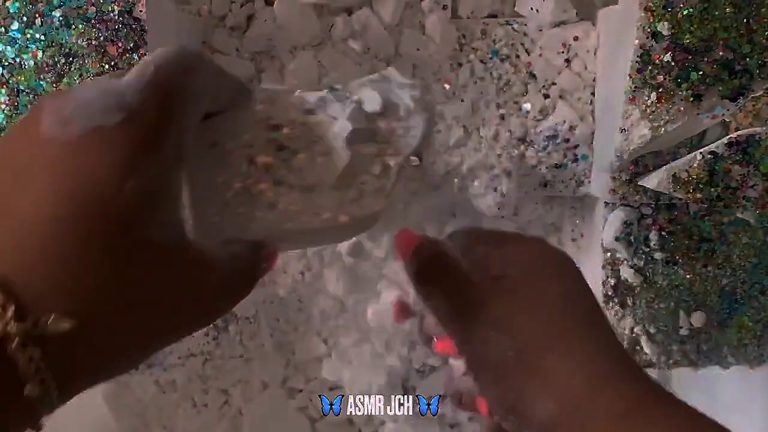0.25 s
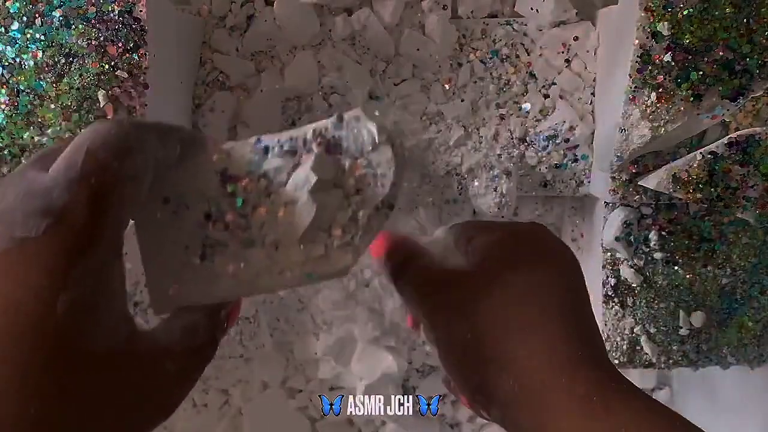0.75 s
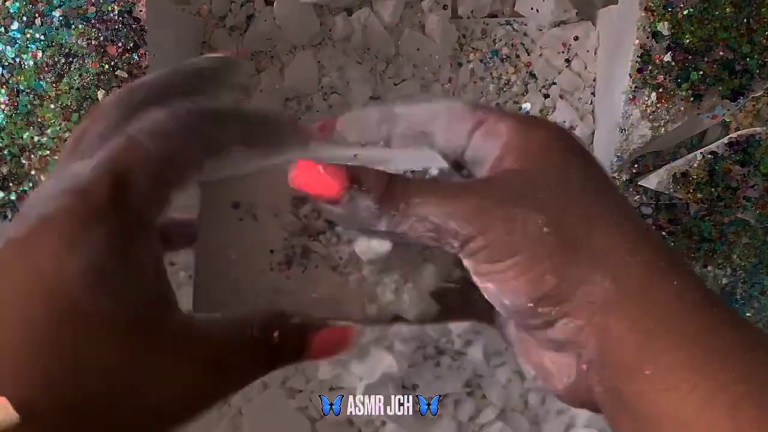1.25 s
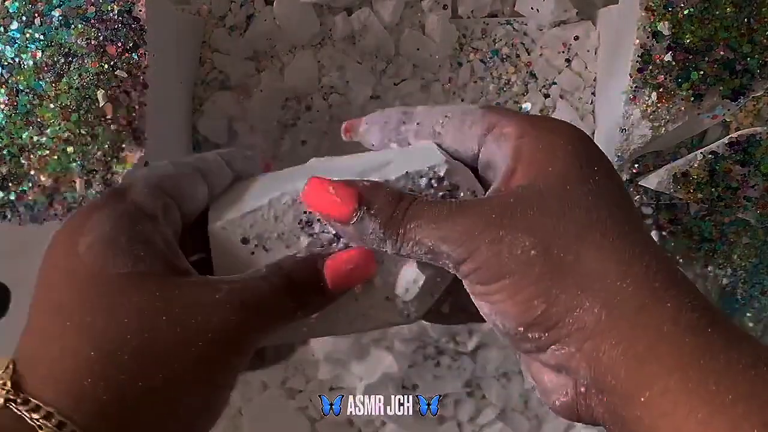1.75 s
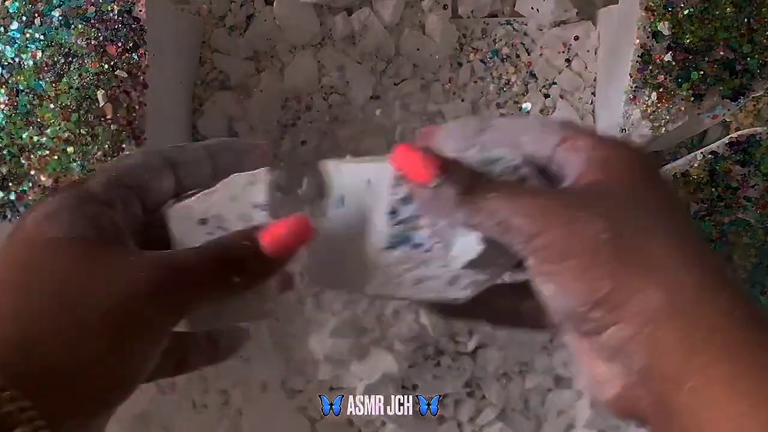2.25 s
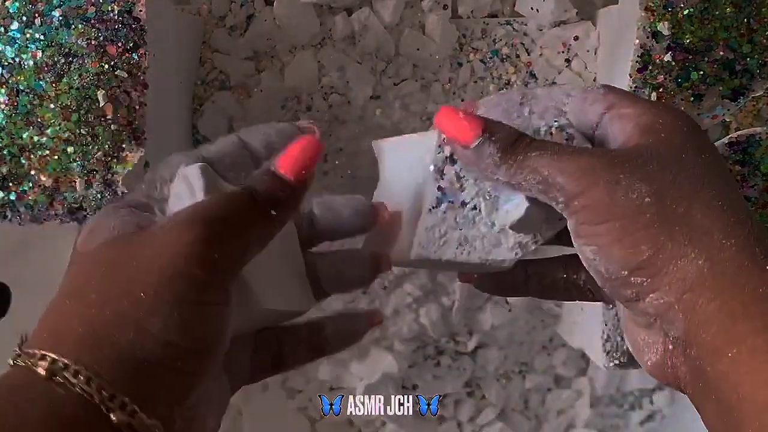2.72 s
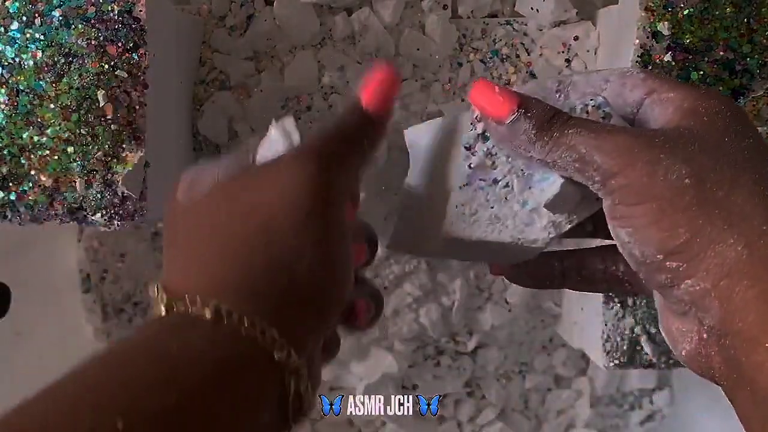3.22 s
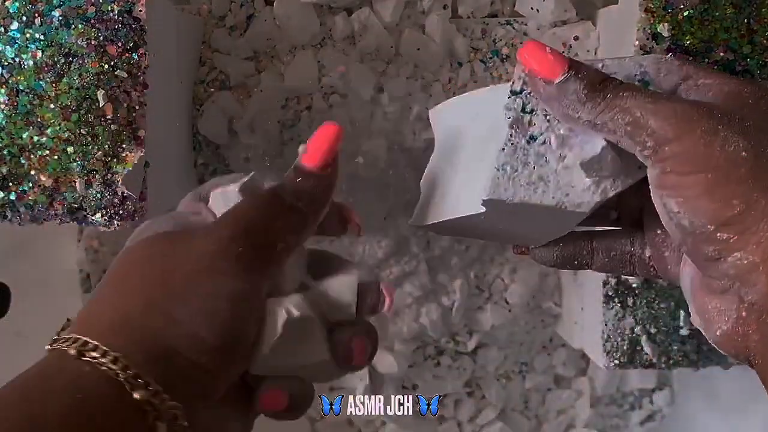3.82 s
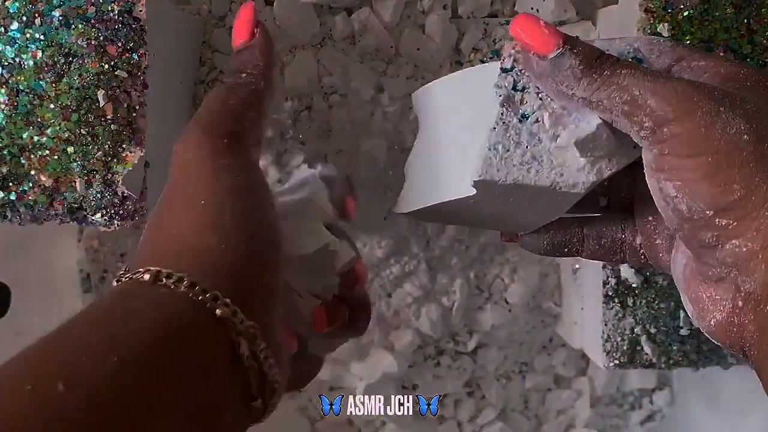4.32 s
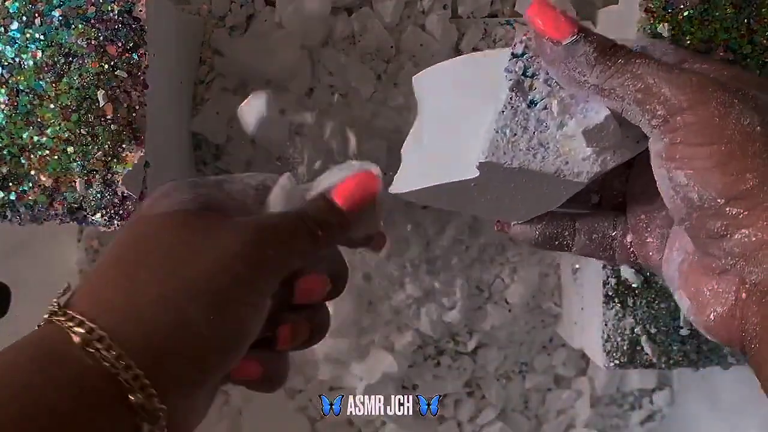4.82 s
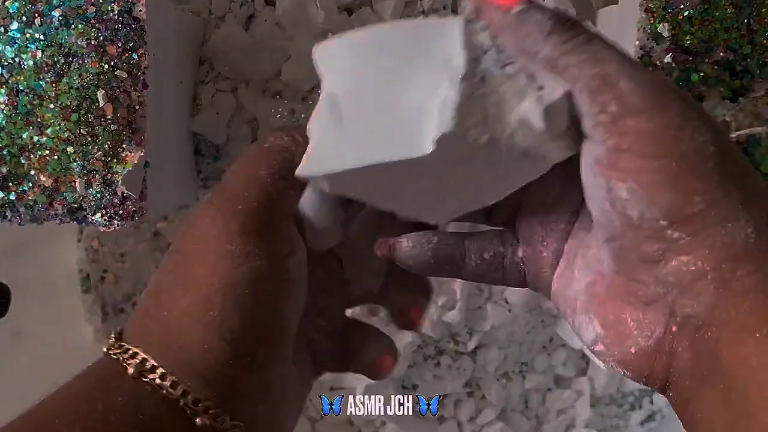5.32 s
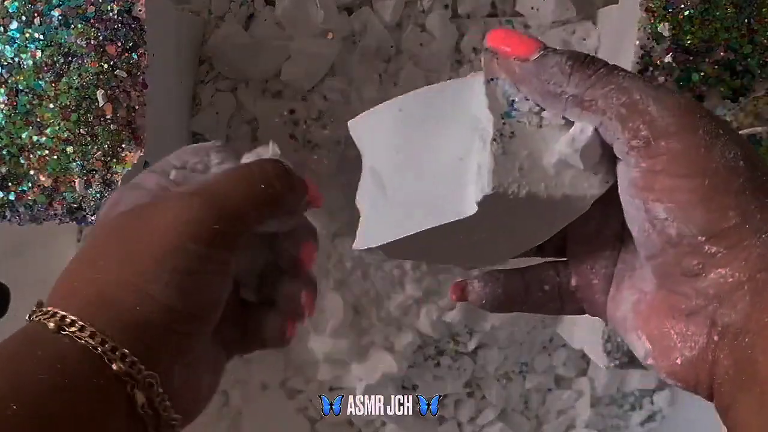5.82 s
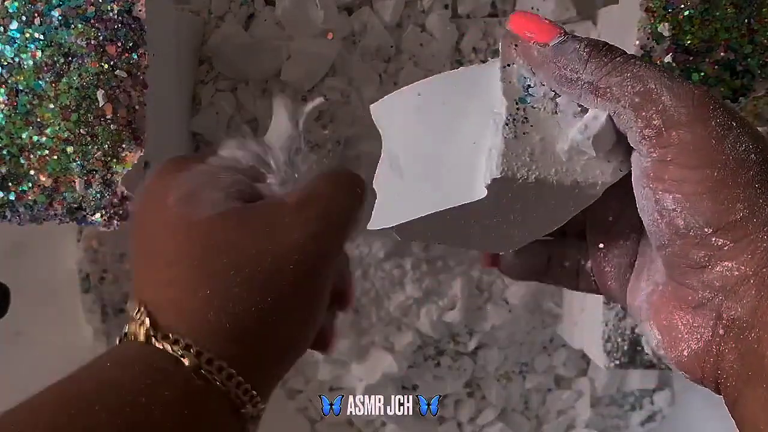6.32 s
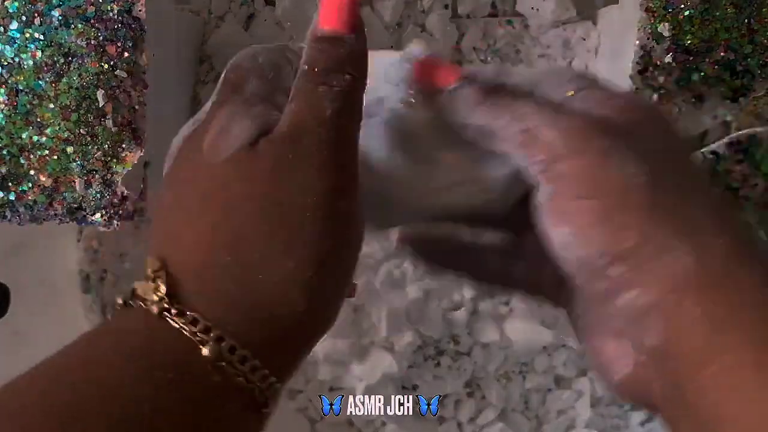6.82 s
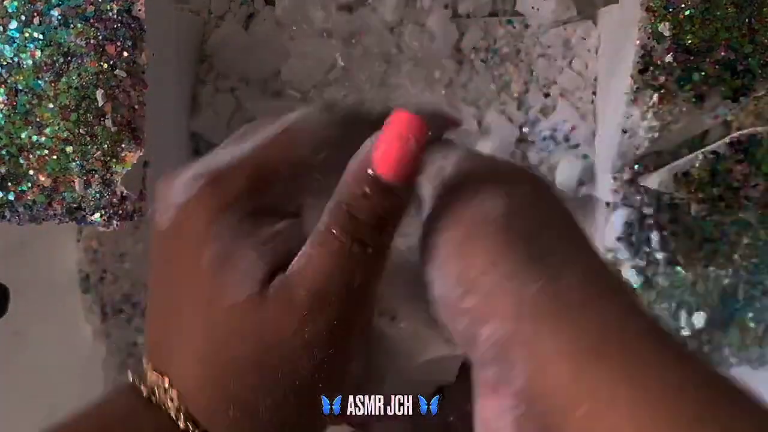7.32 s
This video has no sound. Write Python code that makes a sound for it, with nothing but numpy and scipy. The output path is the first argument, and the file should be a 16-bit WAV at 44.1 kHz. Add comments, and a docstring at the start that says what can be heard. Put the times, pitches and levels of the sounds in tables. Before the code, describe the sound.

Hands snap and crumble soft chalk up close, with gritty crackling, powdery rubbing, falling lumps and a faint bracelet tinkle.

```python
"""Hands break and crumble soft chalk close to a phone microphone in a small room, over a low rumble and hum.
First the chalk snaps, fingers rub its powder, crumbs and grit crackle and a bracelet tinkles.
At 1.3 s lumps thud on the heap below and a hard piece clinks; a loud snap follows at 1.8 s.
Then come flurries of smaller snaps, more rubbing and falling lumps, and the bracelet again after 5 s.
At 7.4 s the chalk breaks in a last loud run of cracks that overloads the recorder."""
import sys
import numpy as np
from scipy import signal
from scipy.fft import rfft, irfft, next_fast_len
from scipy.io import wavfile
from scipy.ndimage import uniform_filter1d, map_coordinates

SR = 44100
rng = np.random.default_rng(int(sys.argv[2]) if len(sys.argv) > 2 else 0)


def generate_wav(sig):
    """Save sig (samples, or channels by samples) to the path in sys.argv[1] as 16-bit PCM at SR."""
    pcm = np.round(np.clip(np.atleast_2d(sig).T, -1, 1) * 32767).astype(np.int16)
    wavfile.write(sys.argv[1], SR, pcm)


N = 332955
TIME = np.arange(N) / SR

# tone of the quiet room: f/Hz, relative level/dB
AIR_TONE = [(100, -14), (150, 7), (500, 4.5), (900, -4), (5800, -18.5), (16000, -24)]
# tone of the low rumble: f/Hz, relative level/dB
RUMBLE_TONE = [(8, 5), (20, 1.5), (45, -6.5), (80, -12.5), (200, -31.5), (400, -94)]
# how long the room echoes: f/Hz, fade time/s (a fade time, or t60, is the time to fall by 60 dB)
ECHO_FADE = [(200, 0.21), (1400, 0.31), (4000, 0.22), (10000, 0.21)]
# tone of the echo: f/Hz, relative level/dB
ECHO_TONE = [(300, -0.5), (1000, 2), (2000, 3), (3000, -1.5), (6000, -2.5)]
# bracelet links touching: t/s, level/dB
TINKLES = [(.414, -38), (0.472, -34), (1.225, -44), (5.119, -34), (5.213, -40), (5.255, -35)]
# notes of the links: f/Hz, relative level/dB, fade time/s
LINK_NOTES = [(7040, -1, 0.035), (9400, -4, 0.025), (13700, -16, 0.029)]
# what the moving hands stir up: t/s, crackle level/dB, patter level/dB, rumble level/dB
HAND_LEVELS = [(0, -32, -34, -24.5), (.3, -44, -41, -28.5), (.45, -52, -46.5, -33.5), (.8, -45, -60, -34.5),
               (1.04, -28.5, -30, -30), (1.14, -38, -41, -30), (1.25, -38, -39.5, -22),
               (1.32, -33, -40, -13), (1.45, -36.5, -35, -30), (1.76, -52, -56.5, -36),
               (2.2, -68, -62, -33), (2.63, -41, -53, -30.5), (2.759, -75, -67, -30), (2.96, -52, -50, -41),
               (3.48, -44.5, -52, -26), (3.6, -36, -42.5, -32), (4.2, -45.5, -69, -36.5),
               (4.4, -40.5, -44.5, -25), (4.651, -38.5, -40.5, -38), (4.75, -36.5, -30.5, -21.5),
               (4.95, -47, -50, -34), (5.5, -58, -48.5, -34), (6.2, -53, -75, -36),
               (6.65, -37.5, -34, -29.5), (6.85, -52, -41.5, -30), (7.35, -47.5, -55, -34),
               (7.55, -36, -49, -24.5)]
# fingers stroking the powder: peak t/s, length/s, level/dB
STROKES = [(0.054, 0.59, -38.5), (0.566, 0.11, -34), (0.825, 0.26, -37.5), (1.038, 0.16, -37),
           (1.204, 0.22, -34), (1.324, 0.15, -35), (1.52, 0.57, -45), (2.104, 0.06, -38),
           (2.177, 0.093, -39), (2.633, 0.11, -30.5), (3.067, 0.43, -41), (3.379, 0.22, -38),
           (3.562, 0.13, -36), (3.764, 0.32, -35), (4.055, 0.43, -50), (4.355, 0.19, -43.5),
           (4.704, 1, -42.5), (5.047, 0.19, -41.5), (5.135, 0.084, -42), (5.31, 0.37, -44),
           (5.71, 0.16, -42.5), (6.25, 0.16, -41), (6.47, 0.27, -44), (6.61, 0.31, -43.5),
           (6.802, 0.32, -38), (7.065, 0.096, -34), (7.075, 0.63, -38)]
# tone of skin on powder: f/Hz, relative level/dB
POWDER_TONE = [(900, -51), (1500, -16), (3300, -12), (4200, -8), (6000, -10.5), (13900, -20),
               (16000, -24.5)]
# pitch of the hollow between hand and chalk as the grip moves: t/s, f/Hz, boost/dB
HAND_HOLLOW = [(0, 4470, 2), (2.129, 4400, 0), (2.154, 4300, 14.5), (2.201, 4320, 21.5), (2.22, 4374, -11),
               (2.55, 6020, 19.5), (2.698, 5850, 0.5), (3.3, 4550, -0.5), (6.299, 4130, 1.5),
               (6.401, 4050, 10), (6.469, 4950, 17), (6.599, 5050, -6.5), (6.85, 5300, 9), (7.06, 5530, 9),
               (7.55, 5500, 1)]
# tone of crumbs falling on crumbs: f/Hz, relative level/dB
HEAP_TONE = [(80, -61.5), (150, 8), (400, -1.5), (1000, -23.5), (2500, -18.5), (6000, -92)]
# lumps landing on the heap: t/s, level/dB, f/Hz
THUDS = [(0.088, -21, 500), (0.142, -12, 170), (0.174, -18, 603), (0.315, -9, 169), (0.531, -11, 620),
         (0.762, -12, 620), (0.99, -15, 165), (1.023, -8.5, 266), (1.288, 5.5, 234), (1.289, -0.5, 1110),
         (1.298, 6, 566), (1.298, 5, 62.6), (1.311, -2.5, 450), (1.492, -20, 537), (1.825, 2.5, 464),
         (1.829, -8, 58), (2.622, -11.5, 95), (2.894, -19, 172), (2.93, -16.5, 360), (3.012, -17, 167),
         (3.079, -5.5, 314), (3.349, -19, 480), (3.384, -21.5, 590), (3.421, -24, 244), (3.791, -22.5, 220),
         (3.992, -17, 556), (4.334, -10.5, 1060), (4.338, -8, 181), (4.543, -19.5, 520),
         (4.582, -14.5, 270), (4.663, -29, 516), (4.685, -20.5, 557), (4.708, -11, 206), (4.729, -6.5, 128),
         (4.733, -8.5, 1090), (4.744, -5.5, 75), (4.812, -13, 450), (4.814, -12.5, 1010), (5.026, -16, 207),
         (5.026, -16.5, 480), (5.665, -42, 503), (5.726, -25, 205), (5.907, -19, 585), (6.388, -14.5, 1030),
         (6.483, -15.5, 160), (6.574, -16.5, 253), (6.649, -19, 215), (6.755, -17, 173), (6.792, -15, 330),
         (6.807, -20, 417), (6.872, -22.5, 202), (6.886, -13.5, 497), (6.947, -15, 400), (7.4095, 3, 180),
         (7.442, -16, 173)]
# hard pieces knocked: t/s, level/dB, lowest note f/Hz, upper notes' relative level/dB
CLINKS = [(1.282, -4.5, 3035, -5.5), (1.5006, -19, 2980, -25), (1.536, -18, 3010, -18),
          (2.469, -13, 4170, -32)]
# upper notes of those pieces: pitch ratio, relative level/dB, fade time/s
UPPER_NOTES = [(1.287, 2.494, 0.036), (1.544, 1.995, 0.04)]
# short runs of cracks, from faint ticks and a scrape to the loud final break: t/s, length/s, level/dB
CRACK_RUNS = [(0.549, 0.0096, -22.5), (1.322, 0.041, -22), (2.318, 0.018, -41), (2.573, 0.1, -31),
              (2.891, 0.0068, -22), (3.1, 0.017, -23.5), (3.887, 0.015, -34), (3.933, .025, -38),
              (4.019, 0.011, -23.5), (4.061, .02, -36), (5.583, .003, -36), (7.41, .02, 0.5),
              (7.436, 0.038, -10)]
# single snaps: t/s, level/dB, fragment f/Hz, dull part's relative level/dB, bright part's relative level/dB
SNAPS = [(0.033, -24, 4550, -15, -7), (0.11, -13, 4440, 0.5, 0), (0.1275, -20, 4500, 0, -7),
         (0.202, -25.5, 2170, 6.5, -18), (0.289, -28, 2180, 5.5, -2), (0.3123, -23.5, 2440, -5, -25),
         (0.396, -45, 2210, 20.5, -14), (0.4692, -28.5, 6650, -24, -12), (0.5167, -27, 3600, -4, -20),
         (0.5306, -10, 5860, 8, -3), (0.557, -10, 4500, -24, -5), (0.5828, -7.5, 5230, -24, -34),
         (0.5954, -6.5, 4630, -7.5, -5), (0.6103, -18.5, 3550, -1, -2), (0.7638, -17, 5250, 7.5, -5),
         (0.7902, -6.5, 4970, -14, -8.5), (0.989, -19, 3220, -10, -24), (1.0227, -18, 2230, -18, -33),
         (1.0693, -19.5, 2250, 3.5, -36.5), (1.085, -16.5, 3000, -22, -36.5), (1.2245, -16, 6570, -14, -20),
         (1.2832, -4.5, 3340, -14, -14), (1.437, -19.5, 3870, 2, -3.5), (1.5, -23.5, 3150, 6, -7),
         (1.554, -30, 6450, 1, 11), (1.8239, 8, 4890, 2.5, -3.5), (2.037, -25, 5130, -14, 1.5),
         (2.083, -36, 4950, -14, 8), (2.268, -27.5, 5400, -7.5, 1.5), (2.4693, -15, 4070, -23, -38),
         (2.8543, -12, 4370, -10, 2), (2.874, -20, 4230, -22, -2), (2.898, -6.5, 4900, -5, -14),
         (2.9075, -24, 4500, -18, -14), (2.9299, -3.5, 5260, 2.5, -7), (2.956, -20, 4450, -12, -6),
         (2.964, -16, 4380, -25, -3), (2.982, -18, 4500, -12, -5), (3.0097, -6.5, 5050, 0.5, -16),
         (3.034, -5.5, 5100, -17, -5), (3.05, -6, 4650, -3.5, -25), (3.081, -15, 5070, 4.5, 0),
         (3.092, -23.5, 7000, -20, 12), (3.132, -25, 6600, -18, -2), (3.2233, -12.5, 4950, 5, -51),
         (3.3517, -26, 4100, -13, -18), (3.411, -34, 6400, 4, 5), (3.641, -21.5, 4300, -4, -30),
         (3.791, -19, 4480, -4, -16.5), (3.818, -12.5, 4800, -1, -5), (3.8346, -13.5, 4600, -15, -8),
         (3.849, -17, 2250, -1.5, -1.5), (3.9197, -11, 5550, -7, -5), (3.9695, -26.5, 5350, -22, 8.5),
         (3.992, -2.5, 5780, -8.5, -4.5), (4.0157, -16.5, 4900, 9, -24), (4.0904, -17.5, 4600, -29, -14),
         (4.13, -12, 4550, -15, -34), (4.261, -26.5, 5000, -17, -8), (4.3195, -23, 6600, 1, -6),
         (4.335, -22, 2220, 2.5, -9), (4.4089, -21.5, 4030, -5, -9), (4.4973, -21, 3400, -6, -10),
         (4.5616, -29, 4000, 5.5, -17), (4.5843, -23, 2330, 6.5, -12), (4.6094, -17.5, 2040, -21, -5),
         (4.708, -19.5, 5100, -1, -37), (4.769, -13, 5900, -18, -16), (4.774, -23.5, 4120, 4.5, -8),
         (4.8104, -19, 3400, 0.5, -12), (4.9025, -20, 4500, -6.5, -3), (5.02, -36, 6650, -14, 17.5),
         (5.264, -14, 5100, -12.5, -7), (5.5563, -26, 5530, -5.5, -7), (5.6643, -22, 4870, 5.5, -3.5),
         (5.729, -14, 5760, -6, -7.5), (5.8613, -31, 4940, -7, -4.5), (5.9074, -2.5, 4460, -1, -6.5),
         (5.9774, -25.5, 4100, -28, -9), (6.078, -14.5, 5640, -29, -37), (6.1127, -19.5, 5800, -7, -28),
         (6.194, -24, 5260, -52, -9), (6.216, -11.5, 3650, -17, -33.5), (6.236, -20, 3240, -2.5, -2),
         (6.344, -29.5, 3870, -0.5, -5), (6.4745, -19.5, 1900, -2, -5), (6.4857, -23, 4130, 2.5, -4),
         (6.5074, -21.5, 2080, -9.5, -20), (6.563, -37.5, 2200, 13.5, -12), (6.61, -27.5, 3950, 7, -13),
         (6.647, -34, 2190, 10, -15), (6.6585, -19, 4080, -6.5, -4.5), (6.729, -21.5, 4070, 4, -11),
         (6.763, -28, 2150, 4, -13), (7.161, -17, 2450, -2, -29), (7.2756, -16.5, 4820, -35, -18),
         (7.2917, -12.5, 5400, -46, -4), (7.4135, 5, 5160, 1.5, -7), (7.424, 1, 2920, -1, -14),
         (7.436, -1.5, 2730, -22, -10), (7.4427, -6, 5900, 1, -9), (7.475, -2, 4740, -6, -1.5),
         (7.5298, -29.5, 6900, -15, 14)]

# each snap sheds dust and crumbs and jolts the hands: level beside the snap/dB, dB lost a second
DUST_SHED, CRUMBS_SHED, JOLT = (-37.5, 174), (-34, 180), (-28.5, 120)


def amp(db):
    """Turns decibels into a gain."""
    return 10 ** (np.asarray(db) / 20)


def unit(x):
    """Scales each row to an average power of 1."""
    return x / np.sqrt(np.mean(x ** 2, axis=-1, keepdims=True) + 1e-20)


def along(points, hz):
    """Reads between (f/Hz, value) points on a log frequency scale."""
    f, v = np.transpose(points)
    return np.interp(np.log(hz + 1), np.log(f + 1), v)


def filtered(x, response):
    """Gives each frequency f in x the gain response(f)."""
    size = next_fast_len(x.shape[-1] + min(x.shape[-1], 8192))
    return irfft(rfft(x, size) * response(np.fft.rfftfreq(size, 1 / SR)), size)[..., :x.shape[-1]]


def wobble(rate):
    """A smooth random curve through `rate` points a second."""
    return map_coordinates(rng.standard_normal(int(N * rate / SR) + 4), [TIME * rate])


def noise(tone, patchy_db):
    """Noise of a given tone, with louder and softer patches across time and pitch."""
    spectra = signal.stft(rng.standard_normal(N + 512), nperseg=256)[2]
    patches = uniform_filter1d(rng.standard_normal(spectra.shape), size=4, axis=0)
    patches = uniform_filter1d(patches, size=14, axis=1)
    patchy = signal.istft(spectra * amp(patchy_db * patches / patches.std()), nperseg=256)[1][:N]
    return unit(filtered(patchy, lambda hz: amp(along(tone, hz))))


def band(shape, lo_hz, hi_hz):
    """Rows of noise, strongest between two frequencies."""
    white = rng.standard_normal(shape)
    return unit(filtered(white, lambda f: 1 / (1 + (lo_hz / (f + 1)) ** 4) / (1 + (f / hi_hz) ** 4)))


def peaked(x, hz, sharpness, floor):
    """Makes x strongest near one pitch; the floor lets the rest through."""
    return unit(filtered(x, lambda f: floor + 1 / np.hypot(1, sharpness * (f / hz - hz / (f + 1)))))


def place(starts, sounds):
    """Adds each row of sounds to one track at its start time."""
    at = np.round(np.asarray(starts) * SR).astype(int)[:, None] + np.arange(sounds.shape[1])
    return np.bincount(at.ravel(), sounds.ravel(), N + sounds.shape[1])[:N]


def with_snaps(power, shed):
    """Level in dB of a layer that every snap feeds for a moment."""
    offset_db, loss_db = shed
    starts, db = np.transpose(SNAPS)[:2]
    kicks = place(starts, amp(db + offset_db)[:, None] ** 2)
    showers = signal.lfilter([1], [1, -amp(-2 * loss_db / SR)], kicks)
    return 10 * np.log10(power + showers)


def background(rumble_db, hum_hz=110, hum_width_hz=2.7):
    """The room's soft hiss, a wavering hum and the rumble of moving hands."""
    hum = unit(filtered(rng.standard_normal(N), lambda f: 1 / (1 + ((f - hum_hz) / hum_width_hz) ** 2)))
    air = noise(AIR_TONE, patchy_db=6.5)
    rumble = noise(RUMBLE_TONE, patchy_db=2.5)
    return amp(-55.5) * air + amp(-52.5) * hum + amp(rumble_db) * rumble


def room_echo(x):
    """Each frequency fades at its own speed; every quarter second gets a new random tail."""
    echo, step, delay = np.zeros(N + SR), SR // 4, 200
    for start in range(0, N, step):
        hz, t, spectra = signal.stft(rng.standard_normal(SR // 2), SR, nperseg=256)
        tail_db = -60 * t / along(ECHO_FADE, hz)[:, None] + along(ECHO_TONE, hz)[:, None]
        tail = signal.istft(spectra * amp(tail_db), SR, nperseg=256)[1]
        answer = signal.fftconvolve(x[start:start + step], tail / np.linalg.norm(tail))
        echo[start + delay:][:len(answer)] += answer
    return echo[:N]


def bracelet():
    """Each touch rings the small metal links."""
    starts, db = np.transpose(TINKLES)
    t = np.arange(4096) / SR
    ring = sum(amp(level - 60 * t / t60) * np.sin(2 * np.pi * hz * t) for hz, level, t60 in LINK_NOTES)
    return place(starts, amp(db)[:, None] * ring)


def stroke_power(swell_db=19, lift_share=0.42, resting_db=-56.5):
    """Each stroke swells as the finger presses and fades faster as it lifts."""
    power = amp(resting_db) ** 2
    for peak, length, db in STROKES:
        side_s = length * np.where(TIME < peak, 1 - lift_share, lift_share)
        power = power + amp(db - swell_db * np.abs((TIME - peak) / side_s) ** 2.04) ** 2
    return power


def cupped_hand(x, overtone_ratio=1.384, overtone_share=0.64):
    """The hollow of the hand boosts, or at times dips, a moving pitch and a higher one."""
    hz, t, spectra = signal.stft(x, SR, nperseg=256)
    times, pitch, boost_db = np.transpose(HAND_HOLLOW)
    distance = np.log((hz[:, None] + 1) / np.interp(t, times, pitch))
    peaks = np.exp(-(distance / 0.11) ** 2)
    peaks += overtone_share * np.exp(-((distance - np.log(overtone_ratio)) / 0.13) ** 2)
    return signal.istft(spectra * amp(np.interp(t, times, boost_db) * peaks), SR, nperseg=256)[1][:N]


def rubbing(db):
    """Skin slides on powder with a fluttering hiss inside the cupped hand."""
    flutter_db = 2.8 * wobble(60) + 1.5 * wobble(27)
    hiss = cupped_hand(noise(POWDER_TONE, patchy_db=3))
    return amp(db) * unit(amp(flutter_db) * hiss)


def grit(rub_db, count):
    """Fine grains tick brightly under the sliding skin."""
    starts = rng.uniform(0, N / SR, count)
    level_luck, fade_luck = rng.standard_normal((count, 2)).T
    t = np.arange(256) / SR
    db = np.interp(starts, TIME, rub_db) + 8.5 + 4.6 * level_luck
    t60 = 0.0035 * np.exp(0.36 * fade_luck[:, None])
    ticks = band((count, 256), 5500, 12000) * amp(-60 * t / t60) * (1 - np.exp(-t / 0.00056))
    return place(starts, amp(db)[:, None] * ticks)


def patter(db):
    """Crumbs fall on the heap and blur into a low, fluttering noise."""
    flutter_db = 3.2 * wobble(90)
    return amp(db) * unit(amp(flutter_db) * noise(HEAP_TONE, patchy_db=3.0))


def thuds():
    """A lump lands softly: a few low cycles whose pitch sags; bigger, lower lumps last longer."""
    starts, db, hz = (column[:, None] for column in np.transpose(THUDS))
    t = np.arange(4096) / SR
    note = -np.sin(2 * np.pi * hz * t / (1 + 5 * t))
    body = note + 0.42 * band((len(starts), 4096), 0.26 * hz, 1.97 * hz)
    t60 = 0.0093 + 3 / hz
    return place(starts[:, 0], amp(db - 60 * t / t60) * body * (1 - np.exp(-t * hz / 0.2)))


def clinks():
    """A hard piece rings briefly: its lowest note, and the upper ones if struck sharply."""
    starts, db, hz, upper_db = (column[:, None] for column in np.transpose(CLINKS))
    t = np.arange(2048) / SR
    upper = sum(amp(level - 60 * t / t60) * np.sin(2 * np.pi * ratio * hz * t)
                for ratio, level, t60 in UPPER_NOTES)
    ring = amp(-60 * t / 0.03) * np.sin(2 * np.pi * hz * t) + amp(upper_db) * upper
    return place(starts[:, 0], amp(db) * ring * (1 - np.exp(-t / 0.00094)))


def cracks(starts, db, hz, dull_db, bright_db, t60, rise_s, samples, push=0):
    """A noise burst rings the fragment; the dull part is a low burst of noise, strongest near 1.9 kHz."""
    t = np.arange(samples) / SR
    fade = lambda share: amp(-60 * t / (share * t60)) * (1 - np.exp(-t / rise_s))
    shape, hz, dull = (len(starts), samples), hz[:, None], amp(dull_db)[:, None]
    dull_peak_hz = 1890 * np.exp(0.058 * rng.standard_normal(hz.shape))
    burst = peaked(band(shape, 1800, 6630), hz, sharpness=5, floor=0.33) * fade(0.95)
    burst += 0.72 * np.sin(2 * np.pi * hz * t) * fade(0.71)
    burst += dull * peaked(band(shape, 220, 2300), dull_peak_hz, sharpness=10, floor=0.4) * fade(0.73)
    pulse_age = t / 0.00017
    burst += dull * push * pulse_age * (2 - pulse_age) * np.exp(1 - pulse_age)  # one push of air
    burst += amp(bright_db)[:, None] * band(shape, 6360, 7500) * fade(0.91)
    return place(starts, amp(db)[:, None] * burst)


def crackle(crumbs_db, count):
    """Many tiny cracks, louder while crumbs break loose; only a few are large."""
    starts = rng.uniform(0, N / SR, count)
    dull_luck, bright_luck, pitch_luck, fade_luck, rise_luck = rng.standard_normal((count, 5)).T
    db = np.interp(starts, TIME, crumbs_db) + 7.0 + 2.5 * np.minimum(rng.exponential(size=count), 3.5)
    hz = 4000 * np.exp(0.35 * pitch_luck)
    dull_db, bright_db = -6 + 9 * np.tanh(dull_luck), -10 + 7 * bright_luck
    t60 = 0.011 * np.exp(0.7 * fade_luck[:, None])
    rise_s = 0.0013 * np.exp(0.5 * rise_luck[:, None])
    return cracks(starts, db, hz, dull_db, bright_db, t60, rise_s, samples=640)


def crack_runs(count):
    """In each short run, cracks follow each other at random and weaken towards the end."""
    starts, length, db = np.repeat(np.transpose(CRACK_RUNS), count, axis=1)
    progress = rng.uniform(size=len(starts))
    pitch_luck, level_luck, dull_luck = rng.standard_normal((len(starts), 3)).T
    hz = 4000 * np.exp(0.17 * pitch_luck)
    db = db - 5 * progress + 3 * level_luck
    dull_db, bright_db = -4 + 4 * dull_luck, np.full(len(starts), -9)
    return cracks(starts + progress * length, db, hz, dull_db, bright_db,
                  t60=0.021, rise_s=0.0013, samples=1024)


def snaps():
    """Chalk snaps with a push of air; the stronger the snap, the longer the crack runs."""
    starts, db, hz, dull_db, bright_db = np.transpose(SNAPS)
    t60 = 0.014 + 0.0016 * amp(db)[:, None]
    return cracks(starts, db, hz, dull_db, bright_db, t60, rise_s=0.00037, samples=1536, push=0.87)


def scene():
    """All sources at one microphone; the cracks, grit and thuds echo in the room."""
    times, *levels = np.transpose(HAND_LEVELS)
    loose, falling, moving = (amp(np.interp(TIME, times, db)) ** 2 for db in levels)
    rub_db = with_snaps(stroke_power(), DUST_SHED)
    crumbs_db = with_snaps(loose, CRUMBS_SHED)
    soft_sounds = rubbing(rub_db) + patter(with_snaps(falling, CRUMBS_SHED))
    chalk = snaps() + crack_runs(count=10) + crackle(crumbs_db, count=1000)
    chalk += grit(rub_db, count=350) + thuds()
    echo = amp(-19.5) * room_echo(chalk)
    return (background(with_snaps(moving, JOLT)) + echo + bracelet() + soft_sounds + clinks() + chalk)[None]


def record(dry):
    """The recorder rounds off peaks near full scale and cuts the highest treble."""
    ceiling, top_hz = 0.97, 15700
    clipped = dry / (1 + np.abs(dry / ceiling) ** 8) ** (1 / 8)
    return filtered(clipped, lambda hz: np.clip((top_hz - hz) / 500 + 0.5, 0, 1) ** 2)


dry = scene()
out = record(dry)
generate_wav(out)
```